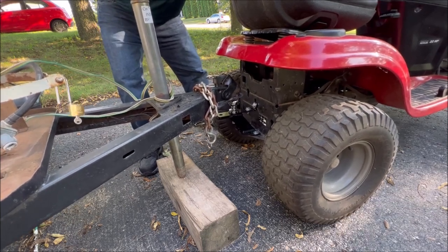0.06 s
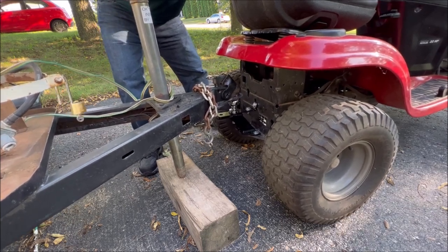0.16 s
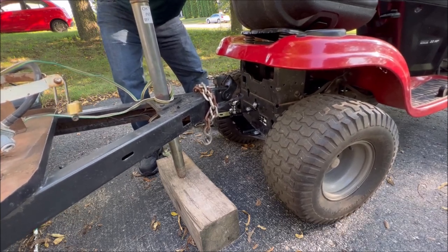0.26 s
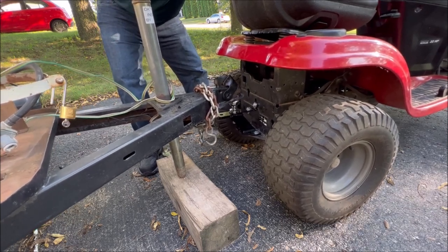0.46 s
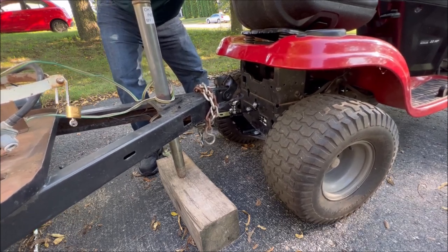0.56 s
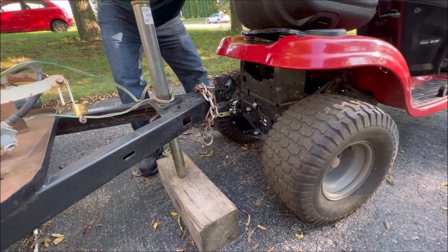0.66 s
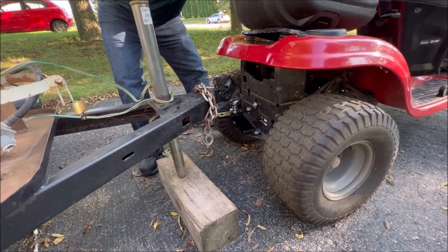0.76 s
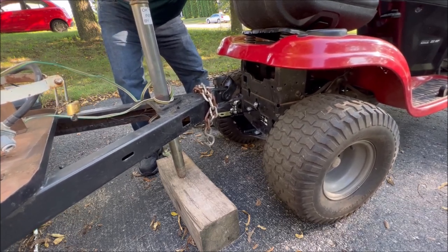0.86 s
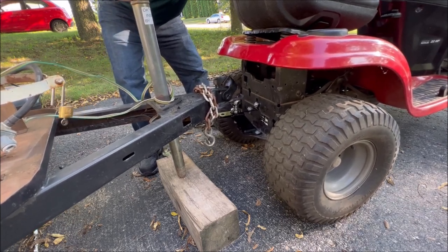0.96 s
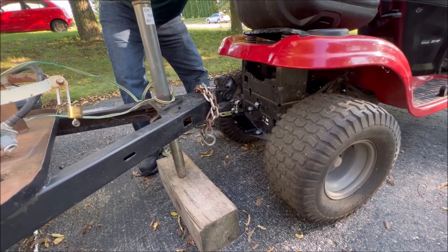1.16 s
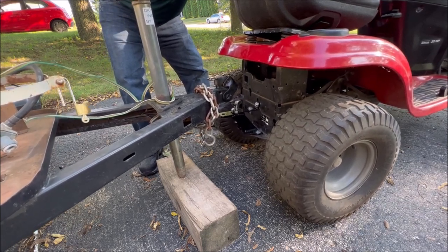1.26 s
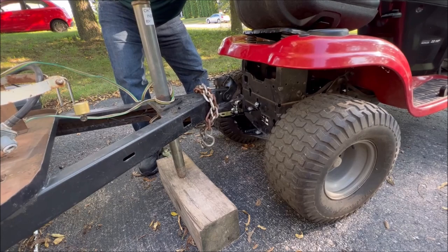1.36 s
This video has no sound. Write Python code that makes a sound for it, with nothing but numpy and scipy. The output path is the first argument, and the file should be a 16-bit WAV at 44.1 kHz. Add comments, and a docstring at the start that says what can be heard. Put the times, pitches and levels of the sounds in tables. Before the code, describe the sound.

Shrill, wavering metal squeaks from a cranked trailer jack, with faint clicks over a low distant motor hum

```python
"""The dry screw of a steel trailer jack squeals near 4.6 kHz as a hand crank winds it outdoors.
The squeal is a wavering sine with overtones and noisy rasps, louder on the left of two spaced microphones.
Filtered noise and tooth contacts grind in the tube; blows ring the frame's modes and a small link pings.
Behind them a distant motor hums in wavering tones and noisy drones, and shaped noise is the yard's hiss."""
import sys
import numpy as np
from scipy import signal
from scipy.fft import rfft, irfft
from scipy.io import wavfile
from scipy.ndimage import uniform_filter1d, map_coordinates

SR = 44100
rng = np.random.default_rng(int(sys.argv[2]) if len(sys.argv) > 2 else 0)


def invert_db(x):
    """Field ratio 10**(x/20) for x, a level in decibels (scalar or array-like)."""
    u = np.asarray(x, float) / 20
    return 10 ** u


def dump_mix(stems):
    """Bounce the given channels to the path in sys.argv[1] as a 16-bit WAV at rate SR."""
    frames = np.atleast_2d(stems).T  # one column per channel
    limited = np.clip(frames, -1, 1)  # hard clip at full scale
    pcm = np.round(limited * 32767).astype(np.int16)
    wavfile.write(sys.argv[1], SR, pcm)


N = 61739  # length of the scene in samples

# grinding of the gears: (time [s], level [dB], level of its treble [dB])
GRIND_LEVELS = [(0.0, -65.5, -51.5), (0.03, -51, -53), (0.17, -59.5, -59.5), (0.202, -55.5, -50),
                (0.31, -63, -65), (0.33, -55, -49), (0.432, -63, -59.5), (0.712, -55.5, -53.5),
                (0.856, -64, -64), (0.942, -54.5, -48.5), (1.0, -72.5, -69), (1.024, -64.5, -90),
                (1.094, -70, -77.5), (1.124, -62.5, -61.5), (1.186, -55, -51.5), (1.33, -67.5, -64),
                (1.346, -55.5, -45.5), (1.4, -59, -63)]
# spectrum of the grinding, as a relative shape: (frequency [Hz], level [dB])
GRIND_COLOUR = [(410, -58.5), (700, 10.5), (4670, 5.5), (10100, -72.5), (12000, -8.5), (13300, -45),
                (16000, -18.5)]
# resonances of the tube: (frequency [Hz], width [Hz], relative level [dB])
TUBE_RESONANCES = [(2240, 11, -1), (2034, 16, -8.5), (5267, 180, 0.5), (5830, 180, -1.5), (7440, 790, -2.5),
                   (11600, 550, -6.5)]
# the motor's two low tones: (time [s], level of the lower [dB], level of the upper [dB])
HUM_LEVELS = [(0.0, -46.5, -41), (0.33, -52.5, -41), (0.358, -59, -51.5), (0.45, -52.5, -44.5),
              (0.708, -49, -48.5), (0.734, -52, -52), (0.996, -47.5, -53), (1.054, -45, -55),
              (1.354, -48.5, -47)]
# noisy drones beside the tones: (frequency [Hz], width of each filter pass [Hz], level [dB])
DRONES = [(87.9, 39, -55), (161.8, 32, -55.5), (220.4, 16, -59.5)]
# spectrum of the yard, as a relative shape: (frequency [Hz], level [dB])
YARD_COLOUR = [(25, -26), (92, 5.5), (270, -12.5), (1240, -20.5), (1530, -29.5), (2220, -20), (2410, -38),
               (3500, -27.5), (4550, -62), (7700, -120)]
# how far left and right differ in the yard: (frequency [Hz], side level relative to mid [dB])
YARD_SIDE = [(40, -10), (150, -19.5), (300, -2.5), (2500, 6), (15000, 10.5)]
# knocks in the frame: (time [s], peak before panning [dB], length of the rattle [s],
#                       centre of the modes it wakes [Hz])
KNOCKS = [(.062, -36, .012, 950), (.095, -38, .01, 1200), (.247, -31, .006, 480), (.249, -25, .012, 800),
          (.262, -34, .035, 230), (.342, -30, .02, 740), (.767, -33, .005, 660), (.815, -31, .012, 900),
          (.816, -39, .012, 400), (.937, -37, .004, 1200), (1.024, -38, .004, 1850),
          (1.027, -29, .045, 690), (1.046, -35, .04, 385)]
# ringing modes of the frame: (frequency [Hz], relative level [dB], time to fall 60 dB [s])
FRAME_MODES = [(225, 0, .1), (390, 0, .07), (480, 0, .05), (670, 0, .06), (750, -2, .05), (820, 0, .04),
               (900, -3, .06), (1220, -3, .04), (1660, -4, .04), (1930, -4, .03)]
# pings of a small link: (time [s], level added to its modes [dB], share of the full ring time [0-1])
PINGS = [(0.067, -56, 0.1), (.084, -72, 0.5)]
# ringing modes of the link: (frequency [Hz], level [dB], full time to fall 60 dB [s])
LINK_MODES = [(14440, 26, .3), (15360, 25.5, 0.2)]
# pitch of the squeal: (time [s], frequency [Hz])
SQUEAL_PITCH = [(.162, 4665), (.19, 4590), (.25, 4660), (.302, 4648), (.338, 4586), (.372, 4640),
                (.41, 4585), (.65, 4706), (.684, 4684), (.834, 4700), (.837, 4500), (.852, 4480),
                (.88, 4563), (.93, 4597), (1.0, 4566), (1.128, 4599), (1.25, 4580), (1.378, 4651)]
# the turning crank beams the squeal: (time [s], left over right [dB], left over right of the octave [dB])
BEAM = [(0.16, 2.0, -4), (0.298, 11, -8), (0.71, 5.5, -2.5), (0.76, 11, -17), (0.852, 4.5, -9.5),
        (0.972, 2.5, -1.5), (1.006, 13.5, -9), (1.108, 3.5, -12.5)]
# loudness of the squeal: (time [s], level [dB])
SQUEAL_LEVELS = [(.15, -70), (.165, -47), (.175, -30), (.2, -27), (.25, -27), (.26, -40), (.296, -41),
                 (.305, -28), (.325, -12), (.345, -13), (.36, -21), (.371, -22), (.377, -41), (.386, -41),
                 (.395, -62), (.412, -36), (.435, -44), (.458, -58), (.472, -49), (.502, -48), (.515, -56),
                 (.625, -62), (.65, -39), (.665, -37), (.682, -23), (.705, -28), (.715, -22), (.73, -24),
                 (.75, -35), (.765, -41), (.8, -51), (.836, -52), (.849, -30), (.895, -30), (.932, -17.5),
                 (.985, -26), (1.02, -17), (1.04, -17.5), (1.075, -24), (1.11, -21), (1.13, -28),
                 (1.146, -50), (1.185, -52), (1.205, -62), (1.216, -45), (1.23, -59), (1.28, -51),
                 (1.315, -66), (1.36, -60), (1.375, -44), (1.4, -54)]
# the screw loses grip and the squeal breaks for a moment: (time [s], depth [dB])
SLIPS = [(.234, 6), (.425, 6), (.485, 8), (.756, 11), (.86, 9), (.886, 4), (1.088, 7)]
# octave overtone, before it dies with a faint squeal: (time [s], level [dB])
OCTAVE_LEVELS = [(0.15, -97), (0.182, -43.5), (0.208, -37.5), (0.304, -81.5), (0.324, -37.5), (0.34, -35),
                 (0.388, -61.5), (0.664, -88), (0.682, -37.5), (0.816, -100), (0.852, -43.5),
                 (0.876, -38.5), (0.894, -45.5), (0.932, -37.5), (0.972, -48.5), (1.09, -30),
                 (1.106, -37.5), (1.126, -61), (1.22, -55)]
# rasps where the squeal turns harsh: (time [s], level before panning [dB], length [s], centre [Hz],
#                                      width of each filter pass [Hz])
RASPS = [(.333, -36, .013, 5000, 350), (.686, -41, .008, 4700, 1000), (.723, -38, .007, 4900, 1400),
         (.935, -44, .015, 5250, 400), (.70, -48, .02, 9500, 600), (.69, -52, .002, 14500, 1500),
         (.811, -48, .006, 4440, 90)]

JACK_LAG_S = .00046  # the jack's sound reaches the right microphone this much later
OPPOSITE = np.array([[1], [-1]])  # the side signal: plus on the left, minus on the right


def times():
    """Sample times in seconds."""
    return np.arange(N) / SR


def curve(table, column):
    """One column of a table, joined by straight lines in time."""
    rows = np.array(table)
    return np.interp(times(), rows[:, 0], rows[:, column])


def unit(x):
    """Scale to rms 1."""
    return x / np.sqrt(np.mean(x ** 2))


def noise():
    """White noise, equally strong at all frequencies."""
    return rng.standard_normal(N)


def colour(x, points):
    """Shape a spectrum by (Hz, dB) points, joined on a log frequency scale."""
    hz = np.maximum(np.fft.rfftfreq(N, 1 / SR), 1)
    point_hz, point_db = np.array(points).T
    gain_db = np.interp(np.log(hz), np.log(point_hz), point_db)
    return irfft(rfft(x) * invert_db(gain_db), N)


def band(x, hz, width):
    """Two-pole resonance, which lets through sound near one frequency."""
    b, a = signal.iirpeak(hz, hz / width, SR)
    return signal.lfilter(b, a, x)


def noise_band(hz, width):
    """Noise through the same resonance twice, at rms 1."""
    return unit(band(band(noise(), hz, width), hz, width))


def walk(rate):
    """Random wander of rms 1, smoothed twice over 1/rate seconds."""
    k = int(SR / rate)
    return unit(uniform_filter1d(uniform_filter1d(noise(), k), k))


def bump(s, length):
    """A smooth hump of height 1 around time s."""
    return np.exp(-.5 * ((times() - s) / length) ** 2)


def click(s):
    """One single sample of 1 at time s."""
    return 1. * (np.arange(N) == int(s * SR))


def ring(x, modes, gains):
    """Decaying modes (Hz, dB, t60) struck by x."""
    t = times()[:SR // 3]
    tail = 0
    for (hz, db, t60), gain in zip(modes, gains):
        fade = 1000. ** (-t / t60)
        tail = tail + gain * invert_db(db) * np.sin(2 * np.pi * hz * t) * fade
    return signal.fftconvolve(x, tail)[:N]


def place(x, pan_db, lag_s):
    """Place a source: pan_db louder on the left, lag_s later on the right."""
    late = map_coordinates(x, [(times() - lag_s) * SR], mode="mirror")
    return np.array([x * invert_db(pan_db / 2), late * invert_db(-pan_db / 2)])


def tone(phase, db, pan_db, lead):
    """A sine, ahead on the left by lead radians; its left-right average is set to the rms level db."""
    left, right = invert_db(pan_db / 2), invert_db(-pan_db / 2)
    together = np.abs(left * np.exp(1j * lead) + right)
    # a floor keeps the gain moderate where the two sides nearly cancel
    together = np.maximum(together, (left + right) / 3)
    gain = invert_db(db) * 2 * np.sqrt(2) / together
    return gain * np.array([left * np.sin(phase + lead), right * np.sin(phase)])


def tooth_contacts():
    """Gear teeth meet at random instants with uneven force, over a steady rub of noise."""
    teeth_per_s, scatter_db = 1500, 2.5
    chance = rng.random((N, 2)).T
    hit = chance[0] < teeth_per_s / SR
    force = invert_db(-scatter_db * np.log(1 - chance[1]))
    teeth = hit * force
    return unit(teeth - teeth.mean()) / 2 + noise()


def tube(rub):
    """The hollow tube rings along in several resonances, each flickering on its own."""
    out = 0
    for hz, width, db in TUBE_RESONANCES:
        out = out + invert_db(db) * unit(band(rub, hz, width)) * invert_db(4.33 * walk(60))
    return unit(out)


def grind():
    """Dense tooth contacts, broad and ringing in the tube; nearby surfaces scatter part of it."""
    tube_db, treble_from_hz = -0.5, 4200
    low_pass = signal.butter(4, treble_from_hz, fs=SR, output="sos")
    out = 0
    # direct sound, then scattered sound: (pan [dB], lag on the right [s], level [dB])
    for pan_db, lag_s, db in ((11.5, JACK_LAG_S, 1.5), (0., .02, -3)):
        rub = tooth_contacts()
        sound = unit(colour(rub, GRIND_COLOUR)) + invert_db(tube_db) * tube(rub)
        low = signal.sosfiltfilt(low_pass, sound)
        treble = sound - low
        sound = low * invert_db(curve(GRIND_LEVELS, column=1)) + treble * invert_db(curve(GRIND_LEVELS, column=2))
        out = out + place(sound * invert_db(db), pan_db, lag_s)
    return out


def hum():
    """A distant motor: two wavering low tones that swell and fade, and weaker noisy drones."""
    waver_hz = 2.9
    out = 0
    # the two tones: (frequency [Hz], left over right [dB], column of HUM_LEVELS)
    for hz, pan_db, column in ((59, 0.5, 1), (111.4, 4.5, 2)):
        phase = 2 * np.pi * np.cumsum(hz + waver_hz * walk(10.9)) / SR
        db = curve(HUM_LEVELS, column) + 3.4 * walk(67)
        out = out + tone(phase, db, pan_db + 3 * walk(9.2), 0.54 * walk(10))
    for hz, width, db in DRONES:
        mid, side = noise_band(hz, width), noise_band(hz, width)
        out = out + invert_db(db) * (mid + invert_db(-5.5) * side * OPPOSITE)
    return out


def yard():
    """Broad outdoor hiss and rumble from shaped noise, most alike left and right in the bass."""
    mid, side = unit(colour(noise(), YARD_COLOUR)), unit(colour(noise(), YARD_COLOUR))
    level_db = -48 + 1.2 * walk(8)  # swells gently
    return invert_db(level_db) * (mid + colour(side, YARD_SIDE) * OPPOSITE)


def knocks():
    """Each knock is a blow and a short rattle, which set the modes of the steel frame ringing."""
    db_per_octave2 = 30  # how fast modes away from the centre weaken
    rattle_matches_blow_s = .00046  # unused; the next line sets the length, 5 ms, of a rattle about as strong as the blow
    rattle_matches_blow_s = .005
    t, out = times(), 0
    mode_hz = np.array(FRAME_MODES)[:, 0]
    for s, db, length, centre_hz in KNOCKS:
        fade = (t >= s) * np.exp(-np.maximum(t - s, 0) / length)
        rattle = fade * noise() / np.sqrt(rattle_matches_blow_s * SR)
        octaves_away = np.log2(mode_hz / centre_hz)
        knock = ring(click(s) + rattle, FRAME_MODES, invert_db(-db_per_octave2 * octaves_away ** 2))
        out = out + invert_db(db) * knock / np.abs(knock).max()
    return place(out, 5, JACK_LAG_S)


def pings():
    """A tiny link, struck by a click, rings in two very high modes that die quickly."""
    out = 0
    for s, db, share in PINGS:
        modes = [(hz, mode_db, t60 * share) for hz, mode_db, t60 in LINK_MODES]
        out = out + invert_db(db) * ring(click(s), modes, np.ones(len(modes)))
    return place(out, 0., .00044)


def squeal():
    """Sticking and slipping lock to one mode of the screw: a wavering sine with two overtones."""
    waver_hz, slip_s, lead_drift_rad = 6, .004, 0.56
    phase = 2 * np.pi * np.cumsum(curve(SQUEAL_PITCH, column=1) + waver_hz * walk(64)) / SR
    db = curve(SQUEAL_LEVELS, column=1)
    for s, depth_db in SLIPS:
        db = db - depth_db * bump(s, slip_s)
    # the level flutters more when the squeal is faint
    flutter_db = 1.2 + 2 * np.clip((-32 - db) / 10, 0, 1)
    # the octave sinks further once the squeal falls below -46 dB
    octave_db = curve(OCTAVE_LEVELS, column=1) - 2 * np.maximum(-46 - db, 0)
    third_db = (db + octave_db) / 2 - 33.5
    main = tone(phase, db + flutter_db * walk(130), curve(BEAM, column=1), 1.16 + lead_drift_rad * walk(36))
    octave = tone(2 * phase, octave_db + 2 * walk(170), curve(BEAM, column=2),
                  -1.73 + lead_drift_rad * walk(19.4))
    # at three times the pitch, left and right move in opposite directions
    third = tone(3 * phase, third_db + 2 * walk(46), 0., np.pi)
    return main + octave + third


def rasps():
    """Short bursts of narrow noise where the squeal turns harsh."""
    out = 0
    for s, db, length, hz, width in RASPS:
        out = out + invert_db(db) * bump(s, length) * noise_band(hz, width)
    return place(out, 10, JACK_LAG_S)


def scene():
    """All sources at the two microphones."""
    return squeal() + rasps() + grind() + knocks() + pings() + hum() + yard()


def top_cut(x):
    """Nothing passes above the cut-off."""
    return signal.sosfilt(signal.butter(12, 16440, fs=SR, output="sos"), x)


def record(dry):
    """Turn the finished mix into the stored sound."""
    return top_cut(dry)


dry = scene()
out = record(dry)
dump_mix(out)
```